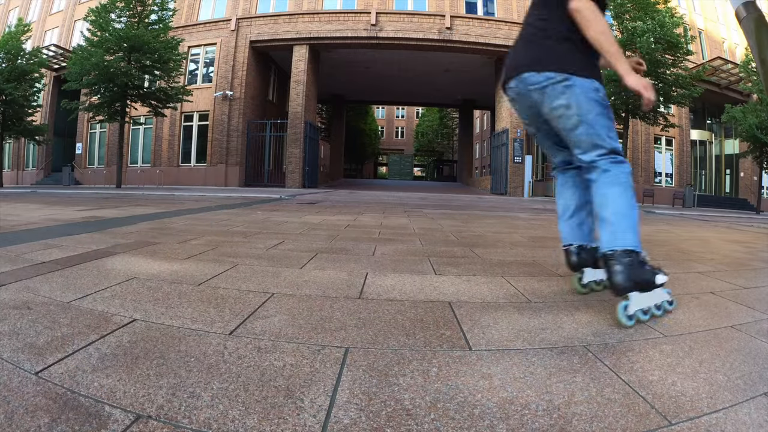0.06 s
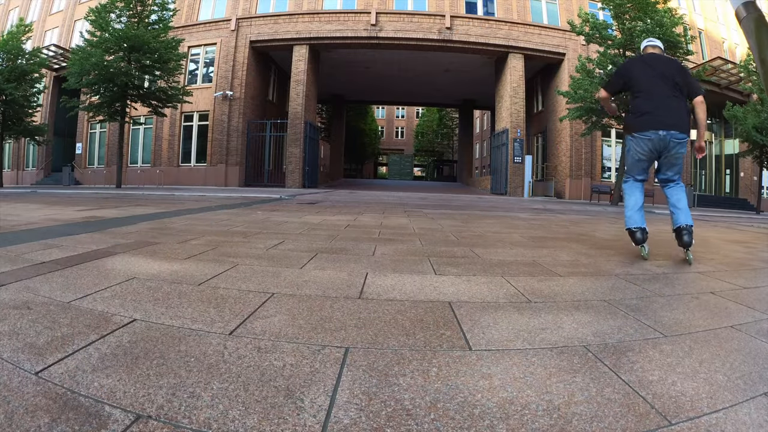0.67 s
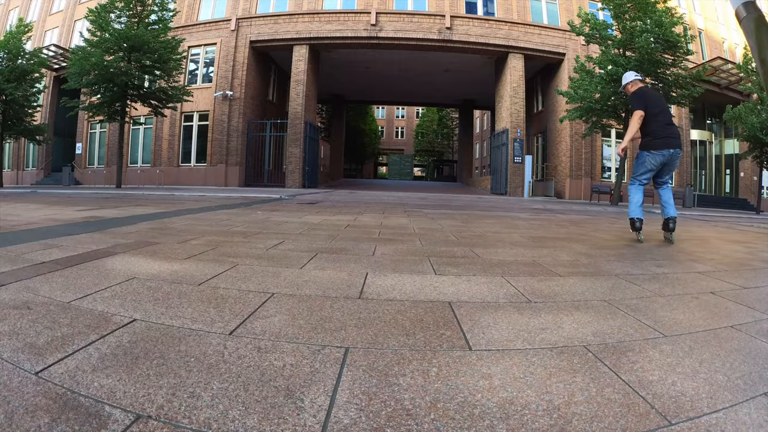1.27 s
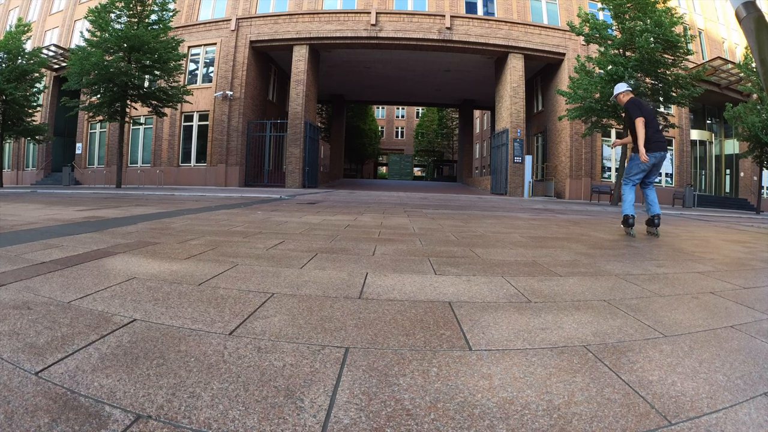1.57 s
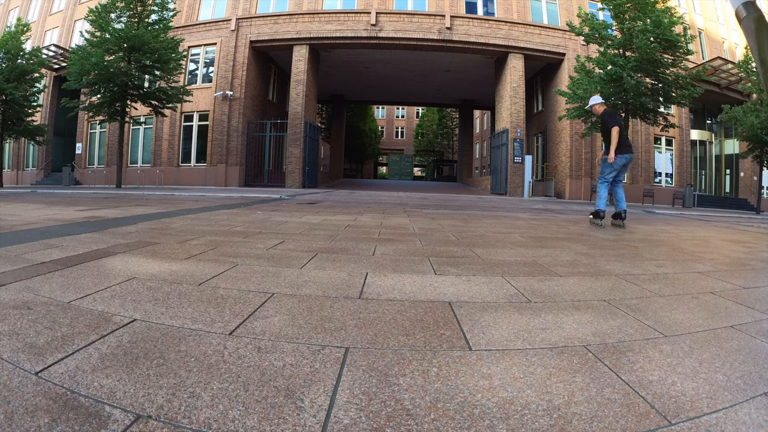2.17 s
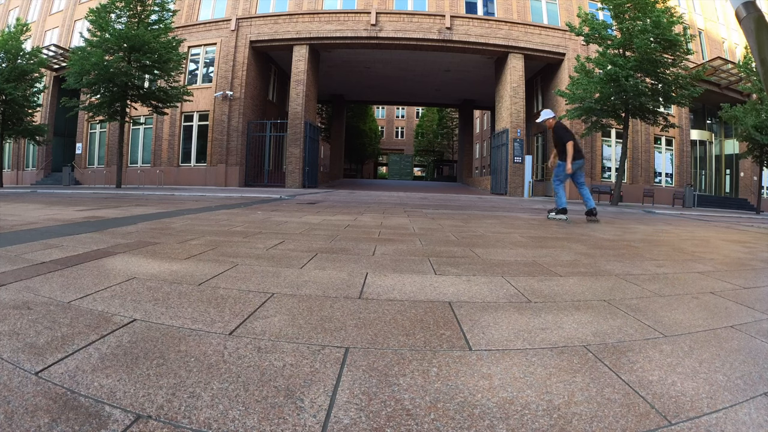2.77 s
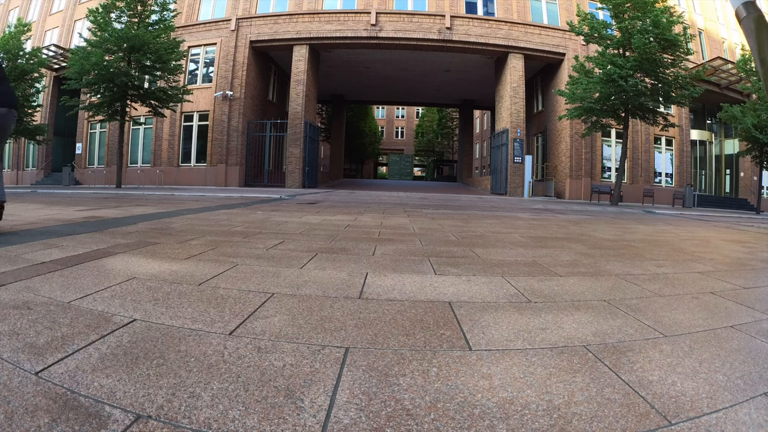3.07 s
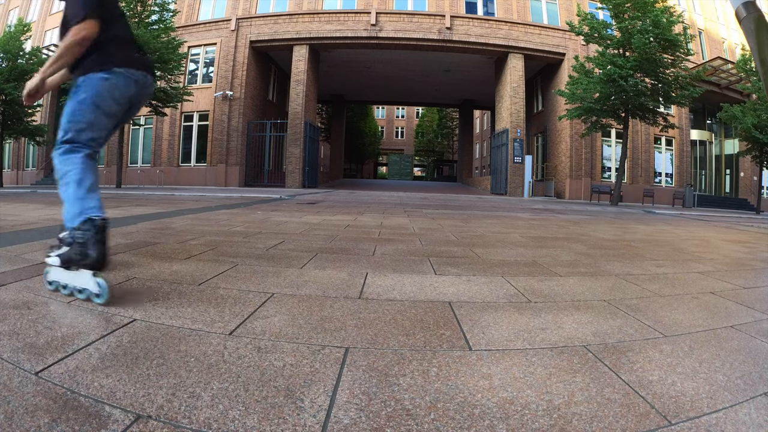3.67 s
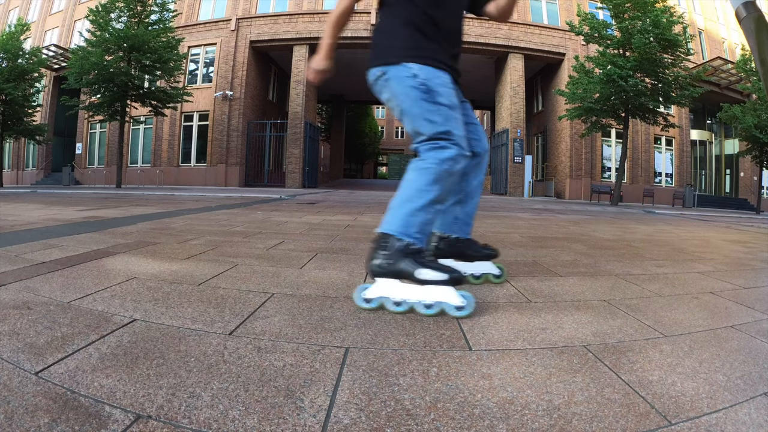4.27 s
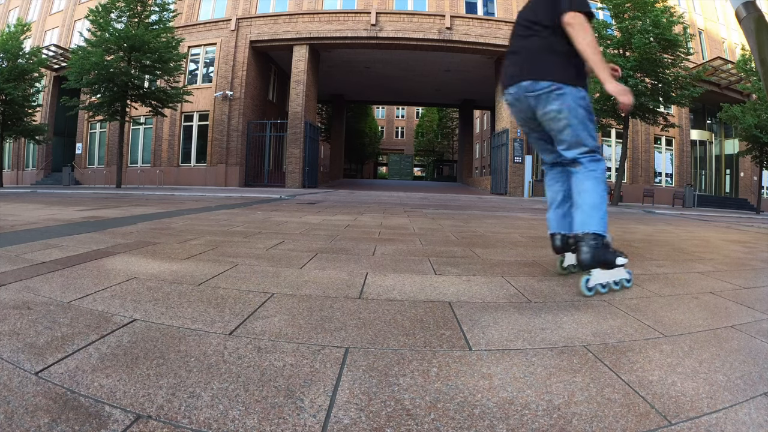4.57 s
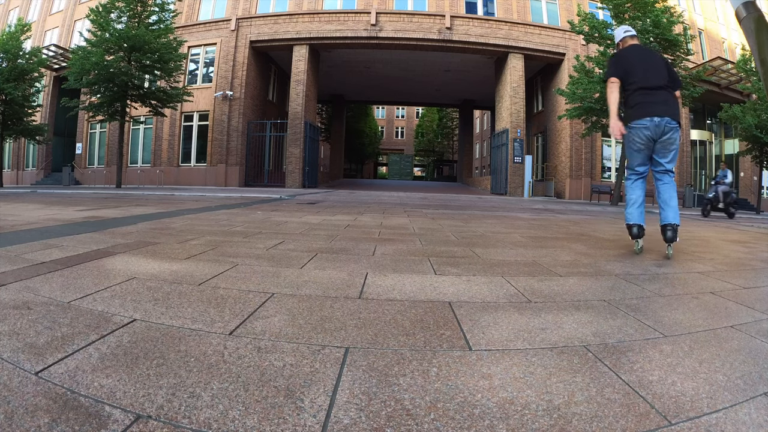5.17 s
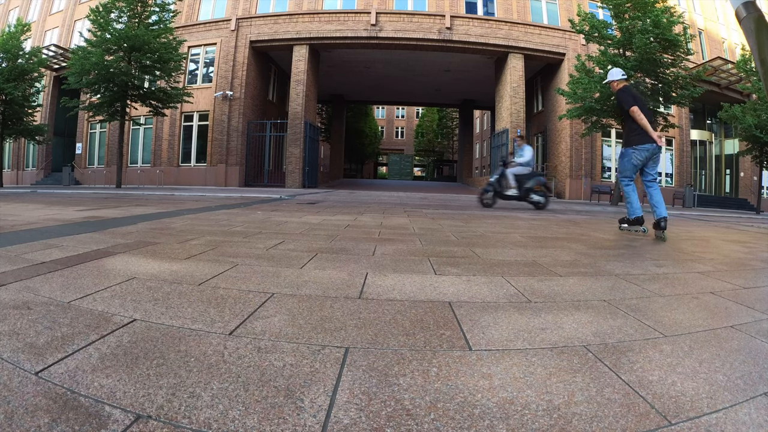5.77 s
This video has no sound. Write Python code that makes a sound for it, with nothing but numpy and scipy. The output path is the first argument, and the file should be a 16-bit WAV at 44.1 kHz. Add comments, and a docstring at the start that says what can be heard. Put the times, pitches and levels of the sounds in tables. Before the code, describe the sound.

Skate wheels rattle and fade across paving, followed by louder street noise, a close rolling pass, thumping wind and a buzzing motor scooter.

```python
"""An inline skater rolls away over the stone slabs of a quiet plaza, in mono: rough stone and joints
ring the skates, grit crackles, wind puffs. A cut leads to stereo with loud traffic, where the skater
passes close by on drumming wheels. Gusts thump on the two microphone ports, and a motor scooter
comes near with engine partials, a casing rasp and a whining drive."""
import sys
import numpy as np
from scipy import signal
from scipy.fft import rfft, irfft, next_fast_len
from scipy.io import wavfile
from scipy.ndimage import uniform_filter1d, map_coordinates

SR = 44100
rng = np.random.default_rng(int(sys.argv[2]) if len(sys.argv) > 2 else 0)


def output_pcm(signal):
    """Save a mono or channel-first signal as 16-bit PCM at the path in sys.argv[1].

    Samples are clipped to [-1, 1] before scaling.
    """
    pcm = np.clip(np.atleast_2d(signal).T, -1, 1) * 32767
    wavfile.write(sys.argv[1], SR, np.round(pcm).astype(np.int16))


N = 261513
T = np.arange(N) / SR
CUT_S = 2.866

# skate frame and boot modes: (centre [Hz], width [Hz], gain [dB])
FRAME_MODES = [(280, 54, 5.5), (397, 180, 4.5), (783, 300, -2.5), (1040, 270, -5), (1660, 210, -11),
               (1907, 156, -9.5)]
# wheel and bearing modes: (centre [Hz], width [Hz], gain [dB])
WHEEL_MODES = [(970, 70, 2), (1620, 70, 2), (1900, 110, -0.5), (2440, 70, -10), (3240, 70, -8),
               (4870, 250, -13)]
# snapping stone crumbs: (centre [Hz], width [Hz], gain [dB])
CRUMB_MODES = [(5000, 350, -13.5), (6350, 550, -17), (8000, 1200, -9), (9400, 520, -12), (10300, 1000, -8)]
# grit under the wheels: (frequency [Hz], density [dB])
GRIT_SPECTRUM = [(1470, -37), (2500, -2), (2980, -10), (3520, -1.5), (6000, -2.5), (10100, -3),
                 (12300, -12), (13500, -39), (15500, -42)]
# finest wheel sizzle: (frequency [Hz], density [dB])
SIZZLE_SPECTRUM = [(7000, -33), (10000, -30), (11500, -3), (14000, 0), (15700, 1)]


def amp(db):
    """Decibels to gain."""
    return 10 ** (np.asarray(db) / 20)


def unit(x):
    """Scale to rms 1."""
    return x / np.sqrt(np.mean(x ** 2) + 1e-20)


def along(points, hz):
    """(Hz, value) points read on a log axis."""
    knots_hz, values = np.transpose(points)
    return np.interp(np.log(hz + 1), np.log(knots_hz + 1), values)


def curves(rows):
    """Per-sample curve for each column after the time."""
    times_s, *columns = np.transpose(rows)
    return [np.interp(T, times_s, column) for column in columns]


def wobble(rate_hz):
    """Smooth random curve, rate_hz knots a second."""
    return map_coordinates(rng.standard_normal(int(6 * rate_hz) + 8), [T * rate_hz], mode="nearest")


def bell(middle_s, length_s):
    """Bell of peak 1, length_s wide at half height."""
    return .5 ** ((2 * (T - middle_s) / length_s) ** 2)


def swells(rows):
    """Gain from (middle [s], length [s], level [dB]) bells."""
    return sum(amp(db) * bell(s, length_s) for s, length_s, db in rows)


def port_swells(rows):
    """Gain per port from (middle [s], length [s], left [dB], right [dB]) bells."""
    return sum(amp([[left], [right]]) * bell(s, length_s) for s, length_s, left, right in rows)


def filtered(x, response):
    """x through a complex frequency response."""
    size = next_fast_len(N + SR // 4)
    return irfft(rfft(x, size) * response(np.fft.rfftfreq(size, 1 / SR)), size)[..., :N]


def colour(x, spectrum):
    """x shaped by a spectrum, at rms 1."""
    return unit(filtered(x, lambda hz: amp(along(spectrum, hz))))


def resonate(x, modes):
    """x through parallel resonances of alternating sign."""
    def response(hz):
        return sum((-1) ** k * amp(db) * 1j * hz * width / (centre ** 2 - hz ** 2 + 1j * hz * width)
                   for k, (centre, width, db) in enumerate(modes))
    return filtered(x, response)


def noise():
    """Two independent white noises."""
    return rng.standard_normal((2, N))


def grains(per_s, spread_db):
    """Two channels of tiny impacts, random in time and size."""
    return unit((rng.random((2, N)) < per_s / SR) * noise() * amp(spread_db * noise()))


def ports(pair, lead_samples=3.72):
    """Independent pair to partly coherent sound at the two ports; left leads."""
    # likeness of the ports: (frequency [Hz], coherence [0..1])
    coherence = [(100, 0.99), (640, 0.99), (1400, 0.95), (3000, 0.81), (7000, 0.2), (15000, 0.091)]

    def mix(hz):
        angle = np.arccos(np.clip(along(coherence, hz), -1, 1)) / 2
        return np.array([np.cos(angle), np.sin(angle)])

    def delay(hz):
        return np.exp(np.outer([1, -1], 1j * np.pi * hz * lead_samples / SR))
    mid, side = filtered(pair, mix)
    return filtered(np.array([mid + side, mid - side]), delay) * amp([[-.35], [.35]])


def pass_by(abreast_s, miss_m, m_per_s):
    """Straight pass: gain re the nearest point, and approach cosine (1 to -1)."""
    ahead_m = m_per_s * (abreast_s - T)
    distance_m = np.hypot(miss_m, ahead_m)
    return miss_m / distance_m, ahead_m / distance_m


def scooter_path(corner_s=4.86, spread_s=0.14, shadow_db=-19):
    """Gain and approach cosine of the scooter emerging from behind a building."""
    near, head_on = pass_by(abreast_s=6.27, miss_m=4.17, m_per_s=6.44)
    hidden = (1 - np.tanh((T - corner_s) / spread_s)) / 2
    return near * amp(shadow_db * hidden), head_on


def skater_path():
    """Distance gain of the skater crossing in front."""
    return pass_by(abreast_s=4.46, miss_m=0.96, m_per_s=1.34)[0]


def city():
    """Faint, wavering city noise, mono."""
    # city bed: (frequency [Hz], density [dB])
    spectrum = [(120, -18), (200, -6.5), (430, -5), (650, -8), (950, -5), (1700, -11), (3000, -22),
                (4800, -34.5), (11000, -53), (15500, -77)]
    return amp(-62 + 1.2 * wobble(5.8)) * colour(noise()[0], spectrum)


def street(roar_db=-37.5, rise_db_per_s=0.92, far_hiss_db=-56.5):
    """Traffic roars; tyre hiss and wheel fizz grow as scooter and skater come near."""
    # traffic roar: (frequency [Hz], density [dB])
    roar_spectrum = [(150, -11.5), (250, -1), (398, -4.5), (435, -3.5), (498, -2.5), (683, -5), (964, -4.5),
                     (1680, -9), (2410, -14.5), (2670, -15.5), (3770, -23.5), (5570, -38.5), (9000, -47.5),
                     (11700, -68), (19800, -120)]
    # tyre hiss: (frequency [Hz], density [dB])
    hiss_spectrum = [(1060, -16), (1800, 9.5), (2030, 2), (2410, 6), (2490, 2.5), (3660, -4), (4680, -10.5),
                     (7000, -63), (9100, -62), (15400, -120)]
    # wheel fizz: (frequency [Hz], density [dB])
    fizz_spectrum = [(3240, 4), (5500, 4.5), (7120, -5.5), (8710, 1), (9980, -5.5), (11200, 0),
                     (13300, -5.5), (15100, -18), (15700, -6)]
    # brief surges of hiss: (middle [s], length [s], level [dB])
    surges = [(3.85, 0.42, -54), (4.28, 0.22, -47), (5.1, 0.066, -48), (5.35, 0.14, -42), (5.8, .05, -39)]
    # their colour: (frequency [Hz], density [dB])
    surge_spectrum = [(900, -16), (1800, 4.5), (2800, 2.5), (3700, 1), (5500, -17), (9000, -23),
                      (15500, -24)]
    scooter_near, _ = scooter_path()
    roar_gain = amp(roar_db + rise_db_per_s * (T - CUT_S) + 1.23 * wobble(15))
    roar = roar_gain * ports(colour(noise(), roar_spectrum))
    hiss_gain = np.hypot(amp(far_hiss_db), amp(-37) * scooter_near) * amp(wobble(22))
    hiss = hiss_gain * ports(colour(noise(), hiss_spectrum))
    fizz_gain = np.hypot(amp(-60) * skater_path() ** 1.8, amp(-50) * scooter_near)
    fizz_gain *= amp(0.5 * wobble(45) + 0.16 * wobble(6.4))
    fizz = fizz_gain * ports(colour(grains(per_s=24000, spread_db=-1.5), fizz_spectrum))
    sizzle = amp(-53 + 0.97 * wobble(9)) * scooter_near ** 2 * ports(colour(noise(), SIZZLE_SPECTRUM))
    swish = swells(surges) * ports(colour(noise(), surge_spectrum))
    return roar + hiss + fizz + sizzle + swish


def turbulence(spectrum, hold_s):
    """Pressure swings levelled over hold_s, independent at each port."""
    x = colour(noise(), spectrum)
    power = np.abs(uniform_filter1d(x ** 2, int(hold_s * SR), axis=1))
    return x / np.sqrt(power + 0.013)


def wind(breeze_db, eddy_db, eddy_knee_db, gust_db, edge_s=0.0027, deep_limit_db=-24):
    """Gusts buffet each port; in the strongest the deep part saturates and brighter eddies take over."""
    # gusts: (middle [s], length [s], left [dB], right [dB])
    gusts = [(0.02, 0.035, -38.5, -33), (0.161, 0.11, -41, -41), (0.28, 0.029, -44, -43),
             (0.426, 0.05, -45, -46), (0.65, 0.32, -53.5, -51), (0.903, 0.048, -41, -39.5),
             (1.025, 0.01, -44, -44), (1.332, 0.046, -41, -34), (1.464, 0.05, -38, -38.5),
             (1.584, 0.02, -35.5, -34), (1.632, 0.021, -34.5, -33.5), (2.111, 0.075, -44, -43.5),
             (2.205, 0.037, -45.5, -45), (2.36, 0.075, -45.5, -43.5), (2.55, 0.022, -48, -50),
             (2.759, 0.027, -50, -51), (2.93, 0.023, -27, -54), (3.351, 0.044, -26, -49),
             (3.578, 0.035, -47, -33), (3.654, 0.051, -30.5, -27.5), (4.126, .12, -61, -34.5),
             (4.422, 0.088, -24, -30), (4.596, 0.038, -53, -15.5), (4.652, 0.06, -27, -16.5),
             (4.712, 0.055, -53, -22.5), (4.774, 0.014, -40, -22.5), (4.808, 0.024, -31, -35),
             (4.955, 0.043, -21, -22.5), (4.997, 0.039, -17.5, -15), (5.049, 0.046, -22.5, -16),
             (5.115, 0.098, -22, -29), (5.272, 0.088, -24, -42), (5.486, 0.095, -26.5, -52),
             (5.617, 0.12, -27.5, -31)]
    # drops in the breeze: (middle [s], length [s], depth [dB])
    lulls = [(0.862, .035, -6), (1.086, 0.03, -8), (1.21, 0.091, -9), (1.706, 0.034, -13), (2, 0.033, -11),
             (2.27, 0.038, -5), (2.645, 0.32, -4.5)]
    # deep buffeting: (frequency [Hz], density [dB])
    buffet_spectrum = [(20, -40), (40, -34), (65, -2.5), (100, 4), (160, 0.5), (250, -9.5), (400, -28),
                       (800, -67), (2000, -77.5), (5000, -120)]
    # eddies: (frequency [Hz], density [dB])
    eddy_spectrum = [(50, -40), (85, -1), (110, 19.5), (150, 15.5), (250, 13), (450, 1), (720, -6.5),
                     (1100, -20), (2500, -70), (6000, -120)]
    power = np.zeros((2, N))
    for s, length_s, left_db, right_db in gusts:
        gate = (1 + np.tanh((length_s / 2 - np.abs(T - s)) / edge_s)) / 2
        power += amp([[left_db], [right_db]]) ** 2 * gate
    gust = amp(gust_db) * np.sqrt(power)
    lull_db = sum(db * bell(s, length_s) for s, length_s, db in lulls)
    breeze = amp(breeze_db + lull_db + 3 * np.array([wobble(22.11), wobble(15)]))
    lumps = unit(amp(3 * np.array([wobble(70), wobble(70)])))
    eddy_gain = amp(eddy_db) * gust * np.tanh(gust / amp(eddy_knee_db)) * lumps
    eddies = eddy_gain * turbulence(eddy_spectrum, hold_s=0.0162)
    deep = gust / np.hypot(1, gust / amp(deep_limit_db))
    return np.hypot(deep, breeze) * turbulence(buffet_spectrum, hold_s=0.0313) + eddies


def thumps(width_cycles=0.32):
    """An eddy hits a port: one short pressure swing."""
    # eddy hits: (time [s], pitch [Hz], left peak [dB], right peak [dB])
    hits = [(2.917, 158, -16.5, -43), (3.105, 178, -15, -43), (4.579, 170, -40, -13),
            (4.594, 150, -40, -15), (4.636, 198, -27, -7), (4.922, 146, -31, -10.5), (4.944, 440, -32, -9),
            (5.026, 218, -6, -26), (5.147, 154, -12.5, -32), (5.154, 143, -11, -38),
            (5.248, 141, -10.5, -30)]
    out = np.zeros((2, N))
    for s, hz, left_db, right_db in hits:
        cycles = (T - s) * hz
        window = np.exp(-(cycles / width_cycles) ** 2 / 2)
        out -= amp([[left_db], [right_db]]) * np.cos(2 * np.pi * cycles) * window
    return out


def tearing():
    """The fastest air tears at the ports in short, brighter bursts."""
    # bursts: (middle [s], length [s], left [dB], right [dB])
    bursts = [(.02, 0.016, -42.5, -40), (3.105, 0.016, -32.5, -51), (4.639, 0.0084, -32, -18.5),
              (4.667, 0.0079, -35, -22), (4.72, 0.013, -52, -25.5), (4.999, 0.031, -26, -17.5),
              (5.043, 0.013, -38, -16), (5.145, 0.015, -22, -40)]
    # tearing air: (frequency [Hz], density [dB])
    spectrum = [(120, -32), (260, 1.5), (480, -1), (750, -8.5), (1200, -33), (3000, -62), (6000, -120)]
    return port_swells(bursts) * turbulence(spectrum, hold_s=0.0075)


def scooter(engine_db=-26, ahead_db=-17, rasp_db=1, jitter=0.00141, throb=0.75, whine_order=24):
    """Engine partials and drive whine sink in pitch; each firing puffs noise through the casing."""
    # drive: (time [s], firing rate [Hz], whine [dB])
    drive = [(3.9, 102.7, -83), (4.35, 104, -58), (4.62, 102.6, -61), (4.78, 101.3, -53),
             (4.95, 101.6, -62), (5.06, 99.8, -55), (5.16, 99.2, -47.5), (5.3, 98.62, -43.5),
             (5.56, 97.5, -48), (5.6, 97.4, -54), (5.7, 97.33, -48.5), (5.93, 97.3, -48)]
    # engine partials: (order [x firing rate], level [dB])
    orders = [(1, -14), (2, -14), (4, -4), (6, -13), (11, 1.5), (12, -7), (14, -1), (17, -4), (22, -12),
              (27, -14), (39, -15)]
    # exhaust and casing modes: (centre [Hz], width [Hz], gain [dB])
    casing_modes = [(600.2, 230, 1.5), (1145, 135, 1), (1330, 134, 3), (1620, 210, -5.5), (2480, 280, -18),
                    (3700, 140, -6.5)]
    # throttle blips: (middle [s], length [s], level [dB])
    blips = [(5.81, 0.06, -35), (5.92, 0.076, -33.5)]
    firing_hz, whine_db = curves(drive)
    near, head_on = scooter_path()
    phase = 2 * np.pi * np.cumsum(firing_hz * (1 + jitter * wobble(30))) / SR

    def partial(order, flicker_hz, scatter_rad, flutter_db):
        # wall echoes scatter the phase differently at each port
        drift = scatter_rad * np.array([wobble(flicker_hz), wobble(flicker_hz)])
        drift += rng.uniform(0, 2 * np.pi)
        return amp(flutter_db * wobble(flicker_hz)) * np.sin(order * phase + drift)
    partials = sum(amp(db) * partial(order, flicker_hz=60, scatter_rad=.66, flutter_db=2.5)
                   for order, db in orders)
    engine = unit(amp(2.5 * wobble(98)) * partials)  # uneven firing
    puffs = ports(noise()) * (1 + throb * np.cos(phase)) ** 2
    rasp = amp(rasp_db) * unit(resonate(puffs, casing_modes))
    whine = amp(whine_db) * unit(partial(whine_order, flicker_hz=45, scatter_rad=0.39, flutter_db=1.5))
    exhaust_gain = near * amp(engine_db + ahead_db * head_on)  # points backwards: weaker ahead
    return np.hypot(exhaust_gain, swells(blips)) * (engine + rasp) + whine


def squeaks(jitter=0.026):
    """A wheel slips sideways: a brief, thin, falling note."""
    # slips: (start [s], length [s], pitch [Hz], fall [share of pitch], level [dB])
    slips = [(1.41, 0.016, 3600, .05, -68), (2.408, 0.045, 3630, 0.056, -71), (2.445, 0.14, 3980, .36, -81)]
    out = np.zeros(N)
    for s, length_s, hz, fall, db in slips:
        progress = np.clip((T - s) / length_s, 0, 1)
        pitch_hz = hz * (1 - fall * progress + jitter * wobble(600))
        envelope = amp(db) * np.sin(np.pi * np.sqrt(progress))
        out += envelope * np.sin(2 * np.pi * np.cumsum(pitch_hz) / SR)
    return out


def scrapes():
    """Each sideways push grinds the grit in its own band."""
    # pushes: (middle [s], length [s], centre [Hz], width [Hz], level [dB])
    pushes = [(0.414, 0.11, 8000, 9000, -66), (0.653, 0.05, 5460, 6950, -69.5),
              (0.84, 0.18, 6040, 9000, -71.5), (1.04, 0.11, 6000, 8000, -73.5),
              (1.246, 0.12, 8460, 2500, -80), (1.424, 0.1, 8140, 1420, -78.5),
              (1.62, 0.17, 8600, 1600, -80), (1.79, 0.1, 9800, 2200, -79), (1.942, 0.11, 10500, 1300, -82),
              (2.312, 0.09, 10100, 2500, -78.5)]
    grind = colour(grains(per_s=5000, spread_db=3.5)[0], GRIT_SPECTRUM)
    return sum(amp(db) * bell(s, length_s) * unit(resonate(grind, [(hz, width_hz, 0)]))
               for s, length_s, hz, width_hz, db in pushes)


def rattles():
    """Runs of small knocks on rough slabs keep the wheels ringing."""
    # runs: (middle [s], length [s], level [dB])
    runs = [(.022, 0.031, -55), (.052, .016, -55), (.089, 0.02, -55), (.115, 0.017, -57), (.178, .012, -60)]
    return swells(runs) * unit(resonate(grains(per_s=2500, spread_db=4)[0], WHEEL_MODES))


def joints(crack_t60_s=.007, rattle_t60_s=.04, rattle_db=-15, trim_db=-5, ring_db=15):
    """A wheel meets a slab edge: a crack, a brief rattle, and a blow that rings frame and wheels."""
    # joint hits: (time [s], level [dB], knock re level [dB])
    hits = [(0.0232, -34, 11), (.028, -39, 15), (0.052, -39, 16), (.072, -34, -2), (.0852, -37.5, 17),
            (0.1179, -44, 22.5), (0.1317, -37, -2), (0.1758, -45, 21.5), (.191, -37, -2), (0.233, -38, 3),
            (0.285, -48, 5), (.335, -39.5, -2), (0.344, -43, -2), (.352, -40, -5), (0.375, -46, -3),
            (0.382, -44, -2), (.414, -41, 11), (0.428, -43, 4), (0.443, -43, 4), (0.463, -46, -4),
            (0.517, -42, 6.5), (0.601, -42.5, 14), (.742, -53, 1), (.867, -50, 0), (1.058, -48, 9),
            (1.1113, -45, -5), (1.38, -46, -4)]
    # crack filter: (frequency [Hz], gain [dB])
    crack_eq = [(300, -4), (3000, -3.5), (11000, -2), (14000, -29)]
    cracks, knocks = np.zeros((2, N))
    t = np.arange(SR // 20) / SR
    decay = amp(-60 * t / crack_t60_s) + amp(rattle_db - 60 * t / rattle_t60_s)
    for s, db, knock_db in hits:
        start = round(s * SR)
        cracks[start:start + len(t)] += amp(db + trim_db) * decay * rng.standard_normal(len(t))
        knocks[start] += amp(db + trim_db + knock_db)
    snaps = amp(-2) * cracks + resonate(cracks, CRUMB_MODES)
    ring = amp(ring_db) * (resonate(knocks, FRAME_MODES) + resonate(knocks, WHEEL_MODES))
    return filtered(snaps, lambda hz: amp(along(crack_eq, hz))) + ring


def skater_leaving(start_m=0.39, far_m=6.14, slowing_s=1.9, grit_fade_db_per_s=1):
    """Rough stone shakes the skates, grit crackles, crumbs snap; all fade as the skater coasts away."""
    distance_m = start_m + (far_m - start_m) * (1 - np.exp(-T / slowing_s))
    rumble = amp(-55) * unit(resonate(grains(per_s=3500, spread_db=7.5)[0], FRAME_MODES))
    grit = colour(grains(per_s=12000, spread_db=-1.5)[0], GRIT_SPECTRUM)
    crumbs = amp(-22) / distance_m * unit(resonate(grains(per_s=730, spread_db=-5)[0], CRUMB_MODES))
    grit_gain = amp(-67 - grit_fade_db_per_s * T - 1.5 * wobble(11.97) + 2 * wobble(65))
    sizzle = amp(-81) * colour(grains(per_s=4400, spread_db=2.5)[0], SIZZLE_SPECTRUM)
    return (rumble + grit_gain * (grit + crumbs)) / distance_m + sizzle / distance_m ** 3


def skater_passing(rumble_db=-38.5, growl_db=-7):
    """Wheels drum on the slabs and sizzle as they carve; each stride loads the frame until it growls."""
    # weight on one skate: (middle [s], length [s], level [dB])
    strides = [(3.87, 0.24, -32), (4.52, 0.45, -39)]
    # wheels carving: (middle [s], length [s], left [dB], right [dB])
    carves = [(3.7, .14, -92, -65), (3.82, .08, -73, -65), (3.9, 0.13, -58, -57), (4.068, 0.028, -56, -56),
              (4.42, 0.32, -64, -66)]
    # rolling rumble: (frequency [Hz], density [dB])
    roll_spectrum = [(30, -57), (60, -12.5), (120, 3), (220, 1), (400, -5), (700, -9), (1500, -43),
                     (4000, -25), (9000, -120)]
    load = swells(strides)
    rumble_gain = np.hypot(amp(rumble_db) * skater_path(), load) * amp(1.2 * wobble(27))
    rumble = rumble_gain * ports(colour(grains(per_s=6000, spread_db=0), roll_spectrum))
    growl = amp(growl_db) * load * unit(resonate(ports(grains(per_s=2500, spread_db=1)), FRAME_MODES))
    carve_gain = port_swells(carves) * amp(wobble(30.9))
    sizzle = carve_gain * ports(colour(grains(per_s=11000, spread_db=2.5), SIZZLE_SPECTRUM))
    return rumble + growl + sizzle


def scene(crossfade_s=0.004):
    """The quiet plaza in mono (wind of the left port only), then the busy one in stereo."""
    quiet = city() + skater_leaving() + rattles() + scrapes() + squeaks() + tearing()[0]
    quiet += wind(breeze_db=-53.5, eddy_db=-3, eddy_knee_db=-31, gust_db=-1.5)[0]
    busy = street() + skater_passing() + scooter() + thumps() + tearing()
    busy += wind(breeze_db=-40, eddy_db=2.5, eddy_knee_db=-21, gust_db=-2)
    cut = np.clip((T - CUT_S) / crossfade_s + .5, 0, 1)
    return (1 - cut) * quiet + cut * busy + joints()


def record(dry, low_hz=65, ceiling=.44, top_hz=15780):
    """Third-order high-pass, soft clip of the hardest gusts, brick-wall low-pass."""
    x = filtered(dry, lambda hz: hz ** 3 / np.sqrt(hz ** 6 + low_hz ** 6))
    x = x / (1 + (x / ceiling) ** 6) ** (1 / 6)
    return filtered(x, lambda hz: hz < top_hz)


dry = scene()
out = record(dry)
output_pcm(out)
```